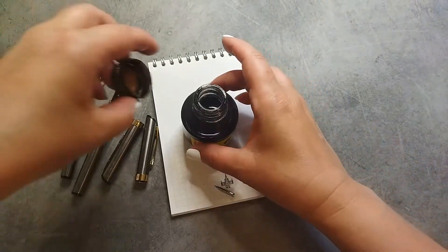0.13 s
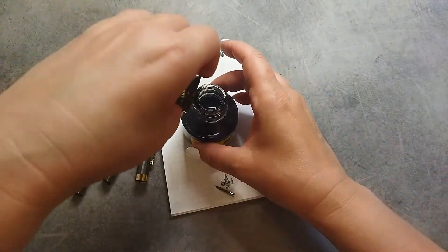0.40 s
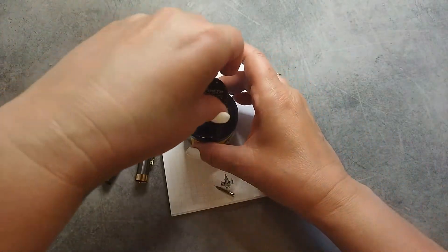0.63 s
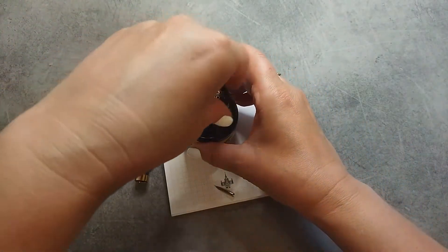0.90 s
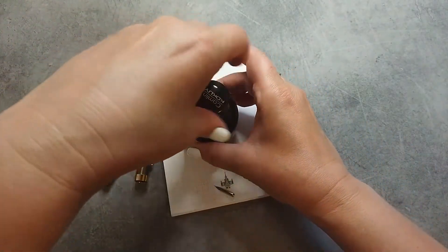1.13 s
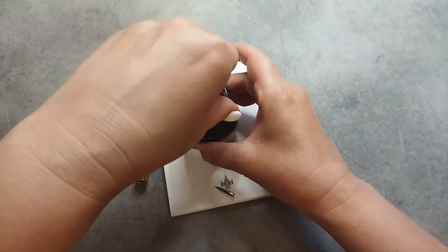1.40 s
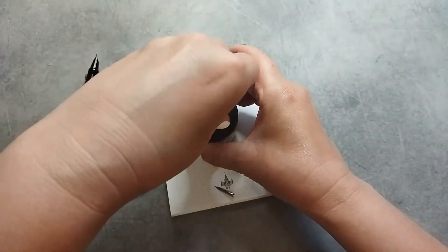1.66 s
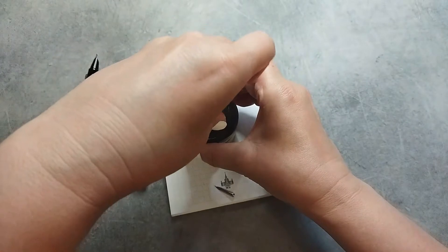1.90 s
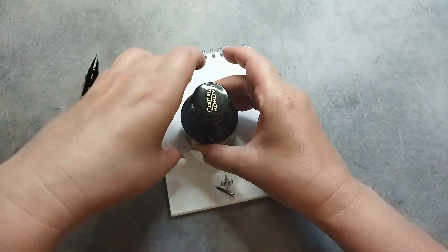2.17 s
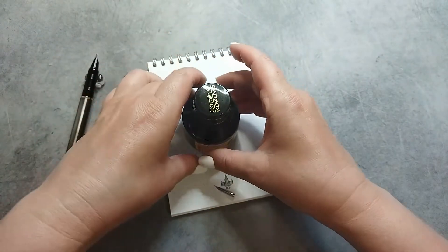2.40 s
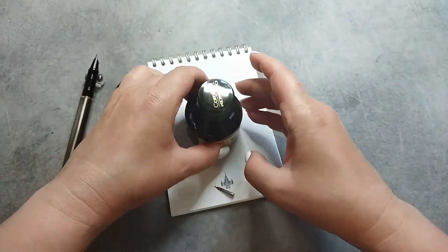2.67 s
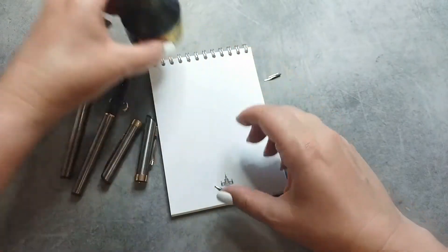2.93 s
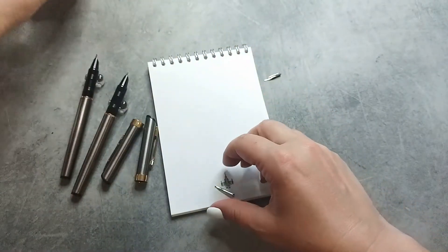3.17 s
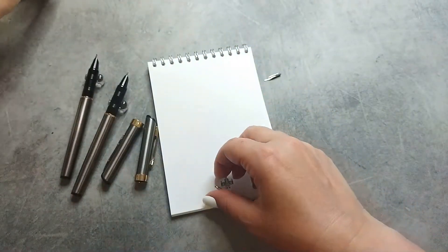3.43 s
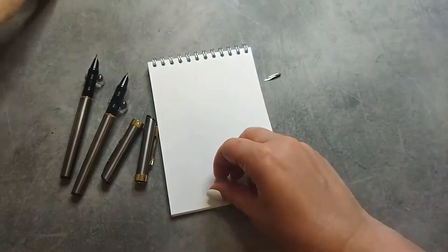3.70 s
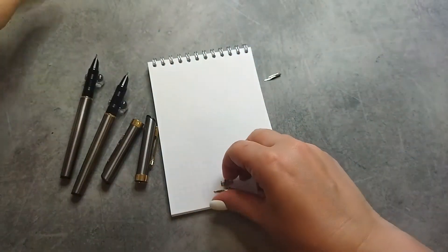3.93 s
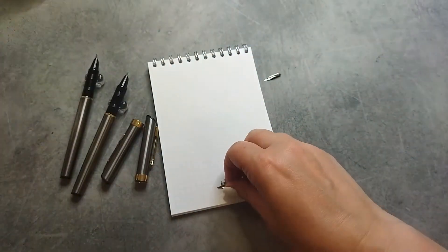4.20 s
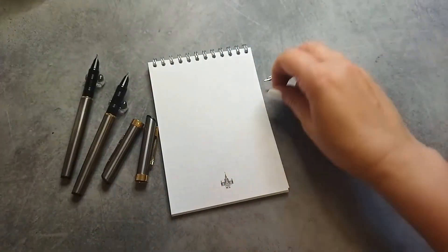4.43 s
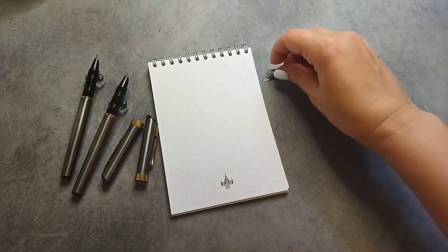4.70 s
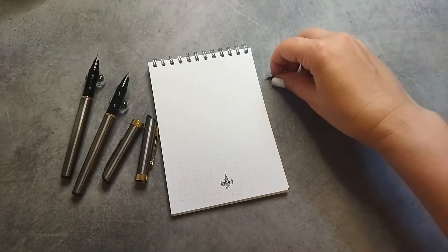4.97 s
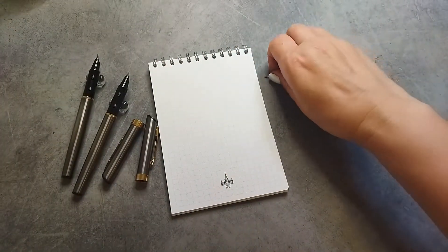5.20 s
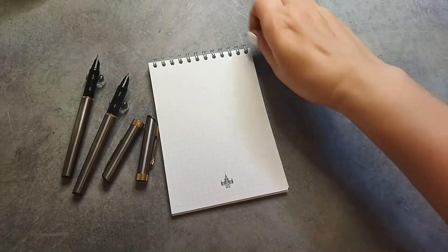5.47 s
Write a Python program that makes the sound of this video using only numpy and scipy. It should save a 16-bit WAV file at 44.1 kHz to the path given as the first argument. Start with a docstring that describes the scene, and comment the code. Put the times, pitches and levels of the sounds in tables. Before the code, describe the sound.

A soft two-tone hum throbs beneath everything. First come crisp plastic and glass clicks with a hollow scrape sliding down in pitch, then sparse faint ticks. Near the middle a hard knock and rocking thud hit the tabletop. Fingers then pick tiny metal pieces off paper with faint clicks and swishes. Indoors, close phone microphones.

```python
"""A quiet room with a hollow table to the left. A plastic cap is lifted, clicks onto a glass bottle's neck and is
screwed down; fingers pick small steel nibs off paper, and the bottle is set on the table. Contacts ring resonant
modes, rubbing is swelling grainy noise, the air under the cap is a gliding resonance, and a machine hums in two
throbbing tones among fainter whines and shaped room noise. Two spaced microphone ports of a phone hear it."""
import sys
import numpy as np
from scipy import signal
from scipy.fft import rfft, irfft, next_fast_len
from scipy.io import wavfile
from scipy.ndimage import map_coordinates

SR = 44100
rng = np.random.default_rng(int(sys.argv[2]) if len(sys.argv) > 2 else 0)


def to_wav(s):
    """Save 16-bit WAV."""
    ch = np.atleast_2d(s).T  # columns
    pcm = np.round(np.clip(ch, -1, 1) * 32767)  # PCM
    wavfile.write(sys.argv[1], SR, pcm.astype(np.int16))


def to_linear_factor(level_db):
    """Convert decibel levels (scalar or array-like) to linear amplitude factors."""
    exponent = np.asarray(level_db, float) / 20
    return 10 ** exponent


N = 246519


def unit(x):
    """Normalization: scale to rms 1."""
    return x / np.sqrt(np.mean(x ** 2) + 1e-20)


def along(points, hz):
    """Logarithmic frequency scale: interpolate (hz, value) points along it."""
    f, v = np.transpose(points)
    return np.interp(np.log(hz + 1), np.log(f + 1), v)


def curves(rows):
    """Linear interpolation in time: one value per sample for each column after the time."""
    s, *cols = np.transpose(rows)
    return [np.interp(np.arange(N) / SR, s, c) for c in cols]


def wobble(rate, channels=1):
    """Slow random modulation: smooth curves through random knots, rate knots a second."""
    knots = rng.standard_normal((channels, int(N * rate / SR) + 4))
    where = np.arange(N) * rate / SR
    return np.array([map_coordinates(k, [where]) for k in knots])


def filtered(x, response):
    """Linear filtering: the spectrum of x times a complex response of frequency."""
    n = x.shape[-1]
    m = next_fast_len(n + 8192)
    return irfft(rfft(x, m) * response(np.fft.rfftfreq(m, 1 / SR)), m)[..., :n]


def resonances(modes):
    """Modal superposition: causal response of (hz, width_hz, level_db) modes with alternating signs."""
    def response(f):
        total = 0
        for k, (centre, width, db) in enumerate(modes):
            damping = 1j * f * width
            total = total + (-1) ** k * to_linear_factor(db) * damping / (centre ** 2 - f ** 2 + damping)
        return total
    return response


# correlation of diffuse sound at the two ports: hz [Hz], likeness [-1 to 1]
LIKENESS = [(60, 0.97), (180, 0.95), (550, 0.43), (1650, -0.077), (4970, 0.04), (15000, -0.053)]


def diffuse(pair):
    """Diffuse-field coherence: two unrelated signals mixed to a likeness that depends on frequency."""
    def mid_and_side(hz):
        turn = np.arccos(np.clip(along(LIKENESS, hz), -1, 1)) / 2
        return np.array([np.cos(turn), np.sin(turn)])
    mid, side = filtered(pair, mid_and_side)
    return np.array([mid + side, mid - side])


def placed(x, pan_db, lead_ms):
    """Level and time difference of a near source: left over right by pan_db, right later by lead_ms."""
    side = np.array([[.5], [-.5]])
    return filtered(x, lambda hz: to_linear_factor(side * pan_db) * np.exp(2j * np.pi * hz * (side - .5) * lead_ms / 1000))


# decay time of the room: hz [Hz], t60_s [s]
ROOM_DECAY = [(100, 0.17), (300, 0.3), (1000, 0.64), (2500, 0.63), (5000, 0.55), (12000, 0.46)]


def room(x, gap_ms):
    """Reverberation: each frequency of the answer decays at its own speed; a fresh tail each call."""
    hz, t, z = signal.stft(rng.standard_normal((2, SR // 2)), SR, nperseg=256)
    decay = to_linear_factor(-60 * t / along(ROOM_DECAY, hz)[:, None])
    tail = diffuse(signal.istft(z * decay, SR, nperseg=256)[1])
    late = np.pad(x, (round(gap_ms * SR / 1000), 0))[None]
    return signal.fftconvolve(late, tail / np.linalg.norm(tail[0]), axes=1)[:, :len(x)]


def add(out, s, x):
    """Superposition: mix x into out from time s."""
    i = round(s * SR)
    out[:, i:i + x.shape[1]] += x[:, :out.shape[1] - i]


# the machine's two tones: pitch_hz [Hz], level_db [dB, before swells], left_right_db [dB], throb_share [0-1]
HUM_TONES = [(135.26, -43, 0.8, 0.81), (169.2, -52.5, 7, 0.2)]
# depth of the throb: time_s [s], depth [0-1, before each tone's share]
THROB_DEPTH = [(0, 0.28), (2.9, 0), (3.1, 0), (5.6, .1)]
# level changes of the lower tone, a dip and a swell: centre_s [s], half_length_s [s], change_db [dB]
LOWER_TONE_SWELLS = [(.41, 0.066, -12), (5.366, 0.049, 7)]
# fainter unsteady tones of the machine: centre_hz [Hz], width_hz [Hz], level_db [dB]
WHINE_BANDS = [(43.3, 1.9, -66), (80, 4.5, -63), (130.3, 4, -61.5), (167, 8.4, -61.5), (193.05, 2.5, -55),
               (240.2, 13.4, -58.5), (286.8, 8, -65), (347.4, 5.4, -64.5), (359.9, 4.4, -57),
               (580.7, 5.5, -64), (746, 68, -61.5), (861, 59, -63), (1319, 7.5, -70), (1815, 13, -69),
               (2290, 8.7, -64.5), (3740, 28, -71)]
THROB_HZ, THROB_TOP_S = 3.85, 2.415


def hum():
    """Amplitude modulation: two low tones throb, nearly alike at both ports; narrow noise bands whine around them."""
    t, low = np.arange(N) / SR, 0
    throb = curves(THROB_DEPTH)[0] * np.cos(2 * np.pi * THROB_HZ * (t - THROB_TOP_S))
    lower_db = sum(db * np.exp(-((t - s) / half) ** 2) for s, half, db in LOWER_TONE_SWELLS)
    for (hz, db, pan_db, share), swell_db in zip(HUM_TONES, (lower_db, 0)):
        level = np.sqrt(2) * to_linear_factor(db + swell_db + 1.18 * wobble(9.2)[0])
        tone = level * np.sin(2 * np.pi * (hz * t + rng.random()))
        low = low + placed((1 + share * throb) * tone, pan_db, 0.24)

    def whine_response(f):
        power = sum(to_linear_factor(db) ** 2 / w * np.exp(-np.pi * ((f - c) / w) ** 2) for c, w, db in WHINE_BANDS)
        return np.sqrt(power * SR / 2)
    whines = filtered(rng.standard_normal((2, N)), whine_response)
    return low + diffuse(whines)


# spectrum of the room noise: hz [Hz], relative_density_db [dB per Hz]
FLOOR_SPECTRUM = [(18, -63), (30, -17), (79, -19.5), (109, -9), (142, -8), (304, -13), (356, -13),
                  (489, -16.5), (872, -21), (1970, -27.5), (2370, -25), (6620, -43), (7550, -43),
                  (9080, -41), (16200, -41)]
FLOOR_DB = -47.5  # rms level about which it wavers


def floor():
    """Diffuse-field noise: shaped random noise keeps a nearly steady level."""
    noise = filtered(rng.standard_normal((2, N)), lambda hz: to_linear_factor(along(FLOOR_SPECTRUM, hz)))
    return to_linear_factor(FLOOR_DB + 1.1 * wobble(3.34)) * unit(diffuse(noise))


# contacts of cap, glass and nib, levels relative:
# start_s [s], neck_air_db [dB], cap_shell_db [dB], glass_db [dB], left_right_db [dB]
CONTACTS = [(0.2073, -47, -30.5, -27.5, 7.5), (0.3337, -66, -39.5, -52, 1.0), (0.4519, -36, -24, -41, -7.5),
            (0.4902, -48, -42, -28.5, 9), (0.6699, -35.5, -25, -27, 8.5), (0.813, -50, -49, -61, -4),
            (0.828, -37.5, -42, -42, 6.5), (1.082, -41, -42, -40.5, -0.5), (1.6855, -39, -41.5, -43, 5.5),
            (1.7965, -75, -70, -58, 4), (1.8179, -75, -70, -58, 4), (2.0513, -75, -68, -56, 4),
            (2.0753, -75, -66, -52, 4), (2.2686, -75, -66, -60, 0.0), (3.7263, -10, -32, -39, 7),
            (4.173, -49.5, -52, -52, 13), (4.972, -56, -57, -51, -1), (5.1634, -61, -53, -61, 4)]
# modes of the air in the neck: hz [Hz], width_hz [Hz], relative_level_db [dB]
NECK_AIR_MODES = [(1185, 290, -10), (1700, 202, -5.5)]
# modes of the plastic cap: hz [Hz], width_hz [Hz], relative_level_db [dB]
CAP_SHELL_MODES = [(2170, 260, -4.5), (2550, 110, 5), (3150, 280, 1.5), (4010, 320, 0), (3920, 67, 3.5),
                   (4220, 390, -4.5)]
# lower modes of the glass, at the neck: hz [Hz], width_hz [Hz], relative_level_db [dB]
GLASS_NECK_MODES = [(4720, 200, -3.5), (5340, 180, -10), (6100, 680, 8), (6240, 41, 1)]
# higher modes of the glass, at the rim: hz [Hz], width_hz [Hz], relative_level_db [dB]
GLASS_RIM_MODES = [(8940, 1400, -3), (9830, 150, 1.5), (9740, 390, -3), (11840, 1050, -5.5),
                   (14000, 450, -8)]
NECK_UNDER_RIM_DB = 2


def clicks():
    """Impact excitation: a burst of chatter rings neck air, cap and glass as strongly as the contact reaches each."""
    out, t = np.zeros((2, N)), np.arange(SR // 2) / SR
    bodies = (NECK_AIR_MODES, CAP_SHELL_MODES, GLASS_NECK_MODES, GLASS_RIM_MODES)
    for s, air_db, cap_db, glass_db, pan_db in CONTACTS:
        parts_db = (air_db, cap_db, glass_db - NECK_UNDER_RIM_DB, glass_db)
        chatter = rng.standard_normal(len(t)) * np.exp(-t / .0018) * (1 - np.exp(-t / .0003))
        chatter[0] += 1.5  # the first hard touch
        rings = [filtered(chatter, resonances(modes)) for modes in bodies]
        click = sum(to_linear_factor(db) * ring / np.abs(ring).max() for ring, db in zip(rings, parts_db))
        add(out, s, to_linear_factor(4.5) * placed(click, pan_db, .2) + room(click, 4))
    return out


# strokes of skin, thread and paper, levels relative:
# start_s [s], peak_s [s], end_s [s], dull_db [dB], bright_db [dB]
# a stroke is cut off at an end before its peak, and silent with an end no later than its start
RUB_STROKES = [(.21, .225, 0.38, -66, -67), (0.45, 0.468, 0.57, -52, -61), (.49, 0.5, 0.61, -49.5, -57),
               (0.616, 0.663, 0.71, -51, -58), (0.683, 0.698, 0.89, -52, -61),
               (0.803, 0.822, 0.88, -52.5, -54.5), (0.995, 1.02, 1.05, -60.5, -56),
               (1.05, 1.067, 1.14, -55.5, -55.5), (1.38, 1.45, 1.58, -68, -66.5),
               (1.67, 1.681, 1.74, -57.5, -57.5), (1.78, 1.817, 1.78, -65, -64),
               (2.037, 2.07, 2.02, -75, -59.5), (2.26, 2.267, 2.4, -78, -69.5),
               (3.727, 3.745, 3.757, -70, -52), (3.897, 3.911, 3.95, -61, -56.5),
               (4.076, 4.155, 4.14, -70, -62), (4.165, 4.169, 4.24, -60.5, -59.5),
               (4.95, 4.985, 5.02, -69, -53.5), (5.022, 5.048, 5.1, -54.5, -46),
               (5.158, 5.179, 5.21, -53, -65), (5.21, 5.28, 5.36, -60, -54.5),
               (5.292, 5.39, 5.42, -55.5, -49)]
# spectrum of the dull register: hz [Hz], relative_density_db [dB per Hz]
DULL_SPECTRUM = [(880, -42), (1500, -11), (1820, -26), (1990, -2.5), (2560, -5), (3740, 2), (5500, -35),
                 (7150, -53), (12100, -120)]
# spectrum of the bright register: hz [Hz], relative_density_db [dB per Hz]
BRIGHT_SPECTRUM = [(2820, -1.5), (4800, -1), (5670, -10), (6720, 6), (7750, -2), (9510, 4), (11000, -15),
                   (14300, -25), (22000, -120)]
# spectrum of the top register: hz [Hz], relative_density_db [dB per Hz]
TOP_SPECTRUM = [(6760, -26), (11500, 15), (13300, 4), (15200, 11.5), (16000, -27.5)]
TOP_DB, TOP_TILT = 0.3, .3  # top over bright; share of the dull-to-bright step that carries on to the top


def rubbing():
    """Stick-slip friction: fine slips make grainy noise that swells and fades with each stroke, in three registers."""
    t, power = np.arange(N) / SR, np.zeros((3, N))
    for *times, dull_db, bright_db in RUB_STROKES:
        top_db = bright_db + TOP_DB + TOP_TILT * (bright_db - dull_db)
        levels = to_linear_factor(np.array((dull_db, bright_db, top_db)))[:, None]
        swell = np.interp(t, times, [0, 1, 0]) ** 1.25
        power += (levels * swell) ** 2
    grain = to_linear_factor(3 * wobble(120) + 3 * wobble(400, channels=2))
    spectra = (DULL_SPECTRUM, BRIGHT_SPECTRUM, TOP_SPECTRUM)
    out = 0
    for level, spectrum, pan_db in zip(np.sqrt(power), spectra, (.5, 4, 4.5)):
        slips = unit(filtered(grain * rng.standard_normal((2, N)), lambda hz: to_linear_factor(along(spectrum, hz))))
        out = out + level * to_linear_factor(3.5) * slips * to_linear_factor(pan_db * np.array([[.5], [-.5]]))
    return out


# scraping that excites the air between cap and neck: time_s [s], relative_level_db [dB]
GAP_LEVEL = [(.43, -80), (.455, -52), (.5, -59), (.62, -61), (.675, -48), (.7, -58.5), (.73, -50.5),
             (.83, -47), (.87, -64), (.92, -80)]
GAP_OPEN_HZ, GAP_SHUT_HZ = 1324, 445
CLOSING_FROM_S, CLOSING_S = .64, .22


def gap_air():
    """Cavity resonance: scraping excites the air under the cap in fits; pitch follows the root of the closing gap."""
    db, = curves(GAP_LEVEL)
    gap = np.clip(1 - (np.arange(N) / SR - CLOSING_FROM_S) / CLOSING_S, 0, 1)
    hz = np.maximum(GAP_OPEN_HZ * np.sqrt(gap), GAP_SHUT_HZ)
    hz = hz + (1 - gap) * 110 * wobble(30)[0]  # the cap rocks
    turn = 2 * np.pi * np.cumsum(hz) / SR
    a, b, c, d = wobble(240, channels=4)  # random amplitudes; c and d reach only the right port
    narrow_noise = np.array([a, a + c]) * np.sin(turn) + np.array([b, b + d]) * np.cos(turn)
    return to_linear_factor(db + 4.5 * wobble(45)) * narrow_noise


# modes of the thin steel: hz [Hz], width_hz [Hz], relative_level_db [dB]
NIB_MODES = [(9000, 60, 2), (10220, 51, -18), (11900, 60, -7), (12500, 60, -2), (14200, 60, -10),
             (15200, 70, 0)]
# loose nibs jingle when the table jolts or a finger drags one:
# start_s [s], t60_s [s], level_db [dB], centre_hz of the modes reached [Hz], reach [octaves]
NIB_JINGLES = [(3.736, .2, -38, 11000, 1), (4.977, 0.28, -46.5, 10300, .1), (2.268, .2, -55, 15000, .05)]


def nibs():
    """Selective modal excitation: quick uneven chatter rings the thin steel in a few narrow high tones."""
    out, t = np.zeros((2, N)), np.arange(SR // 4) / SR
    for s, t60, db, centre_hz, reach in NIB_JINGLES:
        reached = [(hz, w, level - 9 * (np.log2(hz / centre_hz) / reach) ** 2) for hz, w, level in NIB_MODES]
        ring = unit(filtered(rng.standard_normal(len(t)), resonances(reached)))
        envelope = to_linear_factor(db - 60 * t / t60) * (1 - np.exp(-t / 0.0033))
        add(out, s, placed(envelope * ring, 4.9, 0.18))
    return out


# blows on the table: start_s [s], relative_level_db [dB], centre_hz of the modes reached [Hz],
# rise_ms [ms], held_t60_s, the longest ring under the hand [s]
TABLE_BLOWS = [(3.7248, -1.5, 694, 0.44, 3), (3.812, 3, 470, 6, .05), (3.927, -11, 470, 6, .05),
               (5.034, -6.5, 295, 10, .15)]
# modes of the table top: hz [Hz], relative_level_db [dB], t60_s when not held [s]
TABLE_MODES = [(114.7, -39, 0.16), (201, -16, 1), (247.4, -41, .05), (295.7, -7.5, 0.314), (368, -12, 0.11),
               (419, -1, 0.044), (438, -11.5, 0.078), (490, -13.5, 0.059), (554, -13, 0.065),
               (704, -9, 0.075), (789, -17.5, 0.15), (875, -17, 0.12), (1134, -7.5, 0.071),
               (1348, -8.5, 0.053), (1505, -1.5, 0.023), (1595, -18, 0.11), (1750, -20, 0.044),
               (1876, -11, 0.045), (2297, -19, 0.031), (2620, -15, 0.035), (3160, -13.5, 0.044)]
REACH_OCTAVES, REACH_NARROWS = 1.14, 0.64  # at a 1 ms rise; power of the rise time by which it shrinks


def table():
    """Contact time limits bandwidth: the bottle lands and rocks twice, later a hand bumps the top; soft is narrow."""
    out, t = np.zeros((2, N)), np.arange(int(.7 * SR)) / SR
    for s, db, centre_hz, rise_ms, held_t60 in TABLE_BLOWS:
        reach = REACH_OCTAVES / rise_ms ** REACH_NARROWS
        ring = 0
        for hz, level_db, t60 in TABLE_MODES:
            reached = np.exp(-(np.log2(hz / centre_hz) / reach) ** 2)
            ring = ring + to_linear_factor(db + level_db - 60 * t / t60) * reached * -np.sin(2 * np.pi * hz * t)
        ring *= (1 - np.exp(-t * 1000 / max(rise_ms, .05))) * to_linear_factor(-60 * t / held_t60)
        ring = filtered(ring, lambda f: (1j * f / (1j * f + 150)) ** 2)  # an open panel radiates little bass
        # low modes move the whole top, under both ports
        whole = filtered(ring, lambda f: 1 / (1 + (f / 400) ** 4))
        near = placed(whole, -1, 0.074) + placed(ring - whole, 0, 0.425)
        add(out, s, to_linear_factor(-4.5) * near + to_linear_factor(-3) * room(ring - 0.68 * whole, 5.1))
    return out


def scene():
    """Superposition: everything that reaches the two ports."""
    rub = rubbing()
    rub_in_room = to_linear_factor(-5.5) * room(rub[0], 4.4)
    return hum() + floor() + clicks() + rub + rub_in_room + gap_air() + nibs() + table()


def low_pass(x):
    """Removes everything above the highest recorded frequency."""
    return signal.sosfilt(signal.butter(12, 16650, fs=SR, output="sos"), x)


# dips of the microphone openings: centre_hz [Hz], width_hz [Hz], level_db [dB]
PORT_DIPS = [(7400, 500, -7), (11300, 450, -11)]
LOW_CUT_HZ = 42


def record(dry):
    """Transducer response: openings notch the treble, the input cuts the deepest bass and saturates softly."""
    ports = lambda hz: to_linear_factor(sum(db * np.exp(-((hz - c) / w) ** 2) for c, w, db in PORT_DIPS))
    low_cut = lambda hz: 1 / np.sqrt(1 + (LOW_CUT_HZ / (hz + 1)) ** 24)
    heard = filtered(dry, lambda hz: ports(hz) * low_cut(hz))
    heard = heard / (1 + np.abs(heard / .8) ** 4) ** .25  # the input stage rounds off the loudest peak
    return low_pass(heard)


dry = scene()
out = record(dry)
to_wav(out)
```